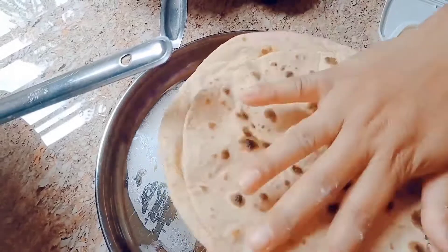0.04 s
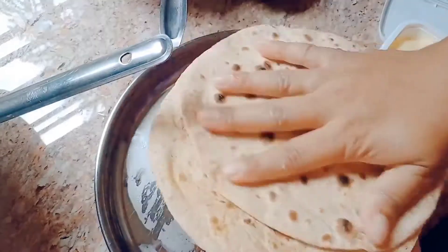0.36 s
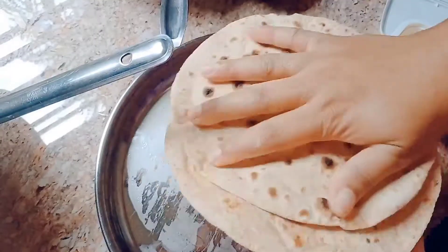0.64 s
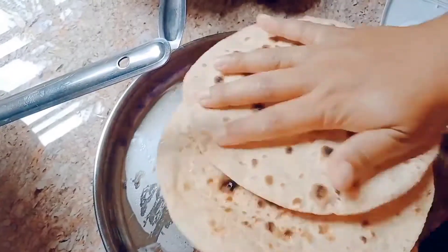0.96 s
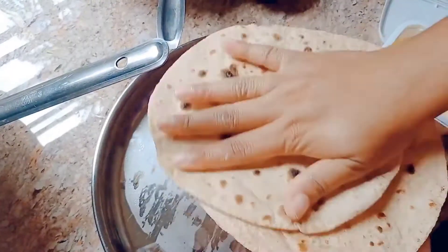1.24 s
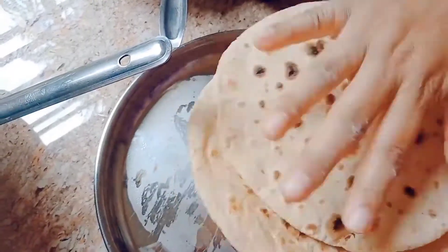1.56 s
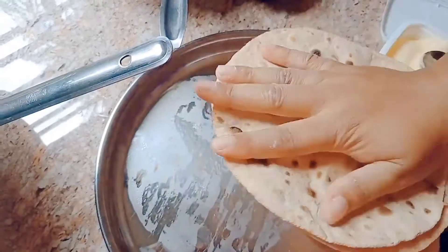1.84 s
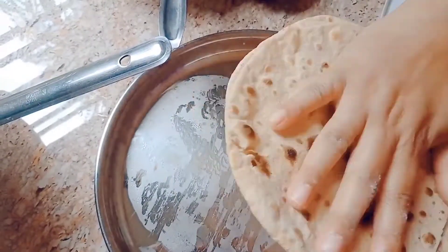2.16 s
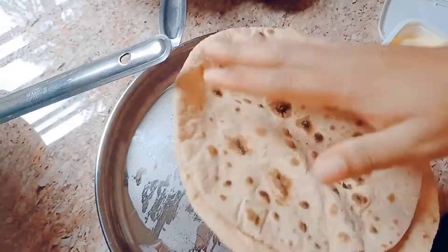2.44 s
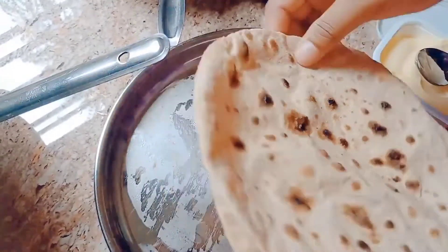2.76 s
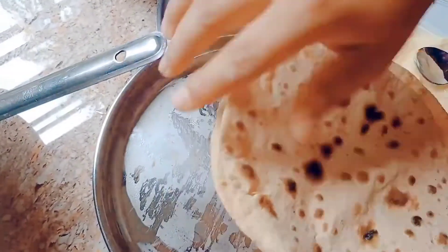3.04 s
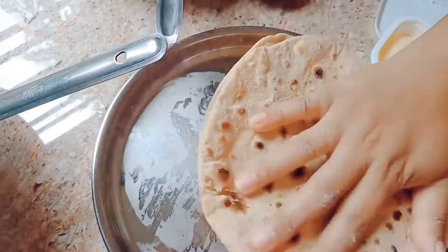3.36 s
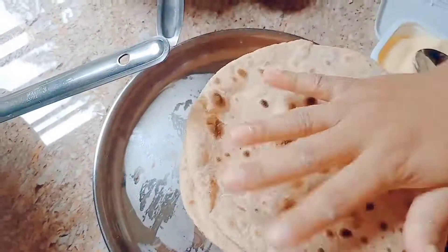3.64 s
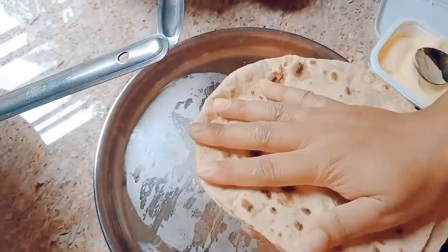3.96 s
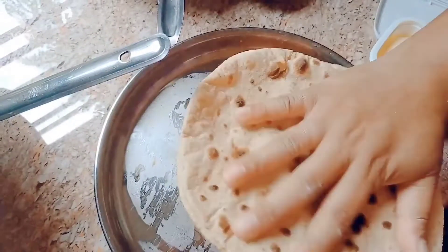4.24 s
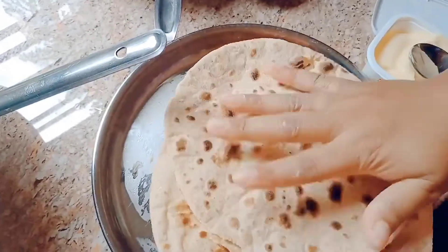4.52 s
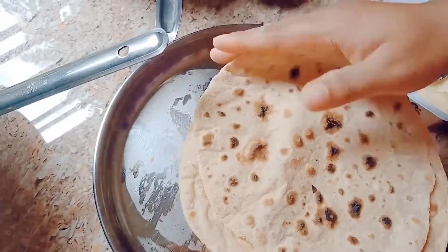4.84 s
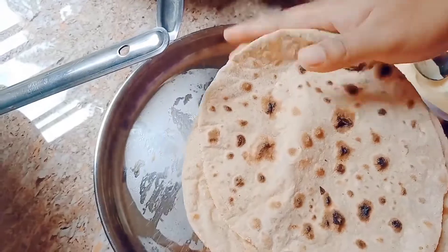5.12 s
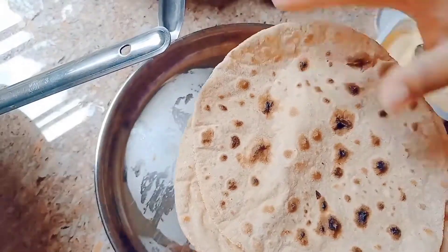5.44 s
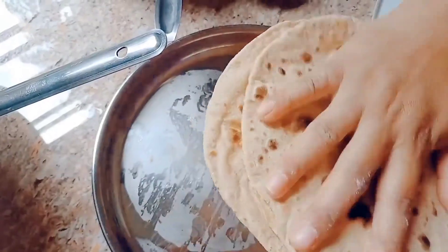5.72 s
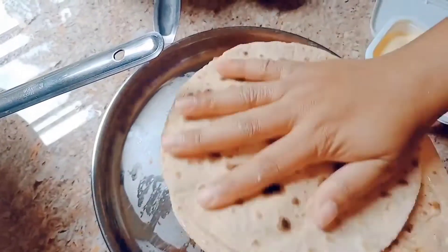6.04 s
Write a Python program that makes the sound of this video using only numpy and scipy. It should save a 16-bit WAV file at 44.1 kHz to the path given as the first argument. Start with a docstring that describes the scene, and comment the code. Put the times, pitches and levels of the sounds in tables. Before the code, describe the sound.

A hand rubs flatbreads together on a steel plate, heard up close in a small kitchen with faint, low room tone. From the start until about 1.5 seconds there is a continuous circling rasp, dry and grainy, with tiny snaps of crust. A soft pat and two brisk strokes follow at about 1.7 and 2.2 seconds, then lighter sliding and a couple of flakes cracking near 2.9. At 3.1 seconds the plate knocks on the counter, with a quick bright rattle and a short, damped metallic ring. Short rubbing strokes return around 3.4, 3.9, 4.3 and 4.8 seconds, some with gentle pats. Just after 5 seconds, fingertips graze the bread's edge with a soft scrape and a faint, high squeak. From 5.6 seconds, light pats lead into a last run of scuffing strokes that fades at about 6.3 seconds.

```python
"""A close, grainy rasp circles round and round, then breaks into short strokes: a hand is rubbing
buttered flatbreads together on a steel plate in a small kitchen. The blistered crusts catch and slip
in dense tiny grains, flakes snap, and the hand pats the stack. Midway the bread is turned over and
flops down, knocking the plate on the stone counter. Later, fingertips graze the edge with a faint squeak."""
import sys
import numpy as np
from scipy import signal
from scipy.fft import rfft, irfft
from scipy.io import wavfile
from scipy.ndimage import uniform_filter1d

SR = 44100
rng = np.random.default_rng(int(sys.argv[2]) if len(sys.argv) > 2 else 0)


def digitize_waveform(pressure):
    """Quantize a signal to 16-bit integers and store it at the path in sys.argv[1].

    Rows of a 2-D input are taken as channels; values are limited to [-1, 1].
    """
    field = np.atleast_2d(pressure).T
    bounded = np.clip(field, -1, 1)
    quanta = np.round(bounded * 32767).astype(np.int16)
    wavfile.write(sys.argv[1], SR, quanta)


N = 276948
T = np.arange(N) / SR

# The colour of the room tone. Each row: frequency in Hz, relative level in dB.
ROOM_TONE_EQ = [(15, -87.5), (25, -47.5), (64, -12.5), (77, -7.5), (99, -9.5), (129, -4.5), (246, -2),
                (410, -10), (495, -13.5), (598, -13), (945, -23.5), (1110, -20.5), (2770, -16),
                (5140, -45.5), (15500, -71.5)]
# The kitchen's low resonances. Each row: frequency in Hz, level in dB.
ROOM_MODES = [(185, -62), (260, -71), (330, -60.5), (400, -65)]
# The long circling rub. Each row: time in seconds, scuff level in dB, crisp treble in dB over the scuff.
CIRCLING_RUB = [(0.075, -50.5, -17), (0.171, -24.5, -7.5), (0.251, -23, -7), (0.637, -23.5, -9.5),
                (0.693, -20.5, -11), (1.193, -24.5, -7.5), (1.285, -28, -8), (1.425, -33, -17.5),
                (1.52, -64.5, -5.5)]
# Single pushes, brisk to light. Each row: start, speed-up time and slow-down time in seconds,
# scuff level in dB, then raspy bite and crisp treble in dB over the scuff.
PUSHES = [(0.067, 0.0064, 0.057, -39.5, -10.5, -6), (1.654, 0.056, 0.043, -31, -15, -14.0),
          (1.706, 0.063, 0.11, -20.5, -5.0, -5.5), (2.1, 0.043, 0.047, -43.5, -11, -12),
          (2.166, 0.073, 0.11, -19.5, -3, -5.0), (2.343, 0.004, 0.19, -52, -4, -11),
          (2.649, 0.032, 0.15, -44, -12, -13), (2.734, 0.062, 0.23, -42.5, -9.5, -11.5),
          (2.985, 0.023, 0.042, -43, -5, -12.5), (3.03, 0.019, 0.057, -47.5, -4.5, -11.5),
          (3.268, 0.048, 0.15, -42.5, -10, -10), (3.361, 0.08, 0.052, -27, -6, -9.5),
          (3.44, 0.065, 0.038, -27, -5.5, -7), (3.533, 0.052, 0.18, -54.5, -9, -7.5),
          (3.763, 0.017, 0.026, -40, -12.5, -18), (3.834, 0.068, 0.091, -23, -3.5, -4.5),
          (4.141, 0.15, 0.053, -47, -5, -7.5), (4.271, 0.09, 0.072, -27.0, -4, -7),
          (4.415, 0.028, 0.12, -48.5, -2.5, -7.5), (4.792, 0.035, 0.067, -31, -9.5, -13.0),
          (5.584, 0.015, 0.13, -46.5, -6.0, -10.5), (5.649, 0.17, 0.07, -25, -4, -11.5),
          (5.868, 0.073, 0.22, -26, -4.0, -10.0), (5.996, 0.061, 0.073, -31.0, -5, -6.0),
          (6.14, 0.037, 0.086, -33.5, -5.5, -7)]
# The rub's colours: mid scuff, crisp top, dull drag. Each row: frequency in Hz, relative level in dB.
SCUFF_EQ = [(590, -41.5), (1000, -17), (1410, -10.5), (1540, -6), (1720, -5.5), (1880, -1), (2180, -0.5),
            (2480, 0.5), (3690, -12.5), (4000, -11), (5320, -31.5), (6000, -30), (7800, -46.5),
            (13200, -120)]
CRISP_EQ = [(2940, 9.5), (5000, -4.5), (5300, -8), (7560, -8), (8490, -1.5), (8870, 2), (9720, -7.5),
            (10700, -11.5), (12100, -9), (13300, -2), (14100, -0.5), (14900, 2), (15800, -12.5)]
DRAG_EQ = [(40, -48), (130, -6.5), (300, -5), (560, -1), (800, -1.5), (1100, 0.5), (1500, -2),
           (2200, -27.5)]
# The steel plate, damped by the bread. Each row: frequency in Hz, level in dB, 60 dB decay in seconds.
PLATE_MODES = [(166.7, -19.5, 0.4), (203.4, -1, 0.32), (290, -28.5, 1), (334, -0.5, 0.36),
               (364, -10.5, 0.52), (397, -14, 0.35), (413, -10, 0.31), (462, -15, 0.23), (575, -26, 0.25),
               (637, -8, 0.31), (688, -22, 0.35), (1061, -21, 0.42), (1190, -29, 0.15), (1596, -20, 0.14),
               (1724, -22, 0.26), (1856, -21, 0.18), (1990, -21.5, 0.18), (2056, -17.5, 0.22),
               (2490, -14.5, 0.11), (2570, -20.5, 0.22), (2695, -22.5, 0.14), (3254, -21, 0.11),
               (3536, -21.5, 0.11), (4200, -21, 0.11), (4560, -21.5, 0.1)]
# Flakes of crust breaking. Each row: start in seconds, relative level in dB.
CRUST_SNAPS = [(0.079, -41), (0.1084, -27), (1.6501, -37), (2.1122, -45), (2.8493, -28.5), (2.8794, -34),
               (3.759, -38.5), (4.1604, -42), (4.807, -42)]
# The hand landing on the stack. Each row: start in seconds, then relative thud and slap levels in dB.
HAND_PATS = [(1.67, -39.5, -34), (3.29, -64, -38), (3.78, -39, -39), (4.782, -53, -43), (5.591, -43, -49),
             (5.667, -39.5, -47)]
# Blows on the plate. Each row: time in seconds, relative level in dB, contact time in milliseconds,
# crack in dB over the blow.
PLATE_KNOCKS = [(3.0871, -20.5, 1.9, -19), (3.0974, -16, 1.7, -24), (3.1036, -22, 0.56, 5.5),
                (3.111, -15, 1.74, -10), (3.1208, -27, .3, -6), (3.1308, -31, 1, -2), (3.144, -42, 0.9, -5)]
# The colour of the knock's dry, bright rattle, with the microphone's resonant peaks.
# Each row: frequency in Hz, relative level in dB.
RATTLE_EQ = [(200, -14.5), (850, -22), (1200, -7), (2500, 4), (4400, 1), (6000, -6.5), (8800, 2),
             (11000, -18), (14500, 0)]

CREEP_DB, CREEP_T60_S = -26.5, 0.5  # after a push the bread creeps on and settles


def undb(db):
    """Decibels to gain."""
    return 10 ** (np.asarray(db) / 20)


def unit(x):
    """Scale to rms 1."""
    return x / np.sqrt(np.mean(x ** 2))


def noise():
    """White noise for the whole scene."""
    return rng.standard_normal(N)


def ring(x, response):
    """Pass a sound through an impulse response."""
    return signal.fftconvolve(x, response)[:N]


def fade(t60):
    """Exponential decay, 60 dB down after t60 seconds."""
    return np.exp(-np.log(1000) * T / t60)


def swell(start, attack, hold, t60):
    """Envelope that rises, holds and dies away; times in seconds."""
    release_age = np.maximum(T - start - attack - hold, 0)
    return np.clip((T - start) / attack, 0, 1) * np.exp(-np.log(1000) * release_age / t60)


def colour(x, points, size=4096):
    """Minimum-phase EQ through (Hz, dB) points."""
    hz, db = np.transpose(sorted(map(tuple, points)))
    grid = np.maximum(np.fft.rfftfreq(size, 1 / SR), 1)
    gain = undb(np.interp(np.log(grid), np.log(hz), db))
    cepstrum = irfft(np.log(gain))
    cepstrum[1:size // 2] *= 2
    cepstrum[size // 2 + 1:] = 0
    return ring(x, irfft(np.exp(rfft(cepstrum))))


def split(x, hz):
    """Crossover: the parts of a sound below and above a frequency."""
    low = signal.sosfiltfilt(signal.butter(6, hz, fs=SR, output="sos"), x)
    return low, x - low


def walk(rate):
    """Smooth random wander of spread 1, about rate changes a second."""
    hold = max(int(SR / rate), 1)
    steps = np.repeat(rng.standard_normal(N // hold + 1), hold)
    return unit(uniform_filter1d(steps, hold)[:N])


def narrow(cycles, width):
    """A narrow band of noise, width Hz wide, around a running count of cycles."""
    phase = 2 * np.pi * cycles
    return unit(walk(rate=width) * np.cos(phase) + walk(rate=width) * np.sin(phase))


def room_tone():
    """Steady kitchen air with a weak drone; its hollow low mids swell and sink, each band alone."""
    air = unit(colour(noise(), ROOM_TONE_EQ)) * undb(0.53 * walk(rate=9.6))
    drone = (1 + .5 * walk(rate=7.9)) * np.sin(2 * np.pi * 92.5 * T)
    hollow = sum(undb(db + 3 * walk(rate=4.0)) * narrow(hz * T, width=45) for hz, db in ROOM_MODES)
    return undb(-50.5) * air + undb(-61.5) * drone + hollow


def circling():
    """Scuff, bite and crisp envelopes of the long rub: the hand swings to and fro, ever more evenly."""
    times, db, crisp_db = np.transpose(CIRCLING_RUB)
    swing_hz, peak_s, settle_s, ease_in_s = 5.7, 0.281, 1, 0.019
    swing_db = 2 * np.exp(-T / settle_s) * np.cos(2 * np.pi * swing_hz * (T - peak_s))
    contact = swell(times[0] - ease_in_s, ease_in_s, times[-1] - times[0], CREEP_T60_S)
    scuff = undb(np.interp(T, times, db) + swing_db) * contact
    crispness_db = np.interp(T, times, crisp_db)
    bite_db = -1 + 0.62 * crispness_db  # the rasp grows with crispness
    return scuff, scuff * undb(bite_db), scuff * undb(crispness_db)


def stroke(start, rise, fall, db, bite_db, crisp_db):
    """Scuff, bite and crisp envelopes of one push: the hand speeds up and slows, the bread creeps on."""
    age = T - start
    ramp = np.clip(np.minimum(age / rise, (rise + fall - age) / fall), 0, 1)
    speed = np.sin(np.pi / 2 * ramp)
    creep = undb(CREEP_DB) * swell(start, rise, fall, CREEP_T60_S)
    slide = np.hypot(speed ** 1.16, creep)
    # steeper curves on the upper bands make the push brightest at full speed
    return undb(db) * slide, undb(db + bite_db) * slide ** 1.18, undb(db + crisp_db) * slide ** 1.29


def rub_envelopes():
    """Scuff, bite and crisp envelopes of all moves, added in power; passing blisters make them uneven."""
    hiss_floor = undb([-58.5, -68, -75.5])[:, None]  # a faint background hiss stays between the strokes
    power = sum(np.square(stroke(*row)) for row in PUSHES) + np.square(circling()) + hiss_floor ** 2
    blisters = undb(1.14 * walk(rate=45.25))
    return np.sqrt(power) * blisters


def slips(rate, spread_db):
    """Random stick-slip clicks, rate a second, many small and a few large; even in power at any rate."""
    happen = rng.random(N) < rate / SR
    size = undb(spread_db * np.minimum(rng.exponential(size=N), 5))
    return unit(happen * size * rng.choice([-1, 1], N) / np.sqrt(rate))


def flakes(x):
    """Voice clicks as thin brittle flakes, which have nothing below the treble."""
    return split(colour(x, CRISP_EQ), hz=4400)[1]


def crumbs():
    """Sparse dry ticks of loose crumbs under the hand."""
    ticks = slips(rate=40, spread_db=0.5)
    crackle = ring(ticks, fade(t60=0.012) * noise())
    return unit(colour(crackle, SCUFF_EQ)) + undb(-6) * unit(flakes(crackle))


def plate_response():
    """The plate's ring after a tap; the rim is not quite round, so each mode has a close, weaker twin."""
    response = np.zeros(SR)
    for hz, db, t60 in PLATE_MODES:
        phase = 2 * np.pi * hz * T[:SR]
        pair = np.cos(phase) + .45 * np.sin(1.006 * phase)
        response += undb(db) * fade(t60)[:SR] * pair
    return response


def rubbing(plate):
    """Crust slides on crust; the grip flutters, and the plate beneath rings faintly along."""
    scuff_gain, bite_gain, crisp_gain = rub_envelopes()
    # a slow slide crackles in separate grains, a fast one fuses into a hiss
    speed = np.clip(scuff_gain / undb(-23), .02, 2) ** .55
    grip = unit(undb(0.48 * walk(rate=130)))
    catches = unit(colour(slips(rate=8000 * speed, spread_db=0) * grip, SCUFF_EQ))
    catches = split(catches, hz=400)[1]  # thin crust radiates no bass
    scuff, bite = split(catches + undb(-15) * unit(ring(catches, plate)), hz=3110)
    flaking = unit(flakes(slips(rate=13000 * speed, spread_db=0.5) * grip))
    crisp, fizz = split(flaking, hz=10130)
    fizz_gain = undb(1.3) * np.clip(crisp_gain / undb(-29.5), .6, 3) ** 0.79  # brisk strokes fizz most
    drag = unit(colour(slips(rate=4000, spread_db=1.5) * grip, DRAG_EQ))
    drag_gain = undb(-42.5) * (scuff_gain / undb(-24)) ** 0.62  # follows the scuff, with less range
    crumb_gain = undb(-8) * np.minimum(scuff_gain / undb(-47.5), 1)  # a light rub stirs them all
    return (undb(-1.06) * scuff_gain * unit(scuff)
            + undb(-1.04) * bite_gain * unit(bite)
            + undb(0.67) * crisp_gain * (crisp + fizz_gain * fizz)
            + drag_gain * (undb(1.4) * drag + crumb_gain * crumbs()))


def crust_snaps():
    """Single brittle flakes break with a brief crackle."""
    hits = np.zeros(N)
    for start, db in CRUST_SNAPS:
        hits[int(start * SR)] += undb(db)
    crackle = ring(hits, fade(t60=0.0091)) * noise()
    return undb(-2) * flakes(crackle) + undb(13) * colour(crackle, SCUFF_EQ)


def hand_pats():
    """The hand meets the soft stack: a dull, quickly damped thud under a dry slap."""
    thud, slap, thud_hz = np.zeros(N), np.zeros(N), 92
    for start, thud_db, slap_db in HAND_PATS:
        thud += undb(thud_db) * np.exp(-((T - start - .016) / 0.012) ** 2)
        slap[int(start * SR)] += undb(slap_db)
    puff_eq = [(30, -19), (60, -9.5), (100, -2.5), (200, 0.5), (400, -9.5), (900, -26), (4000, -78)]
    puff = unit(colour(noise(), puff_eq))
    body = undb(-11.5) * np.sin(2 * np.pi * thud_hz * T) + undb(-1.5) * puff
    skin = unit(colour(slips(rate=2000, spread_db=10), SCUFF_EQ))
    return thud * body + ring(slap, fade(t60=0.088)) * skin


def plate_knocks(plate):
    """The bread lands softly, then the plate hits the counter and chatters to rest."""
    push, crack = np.zeros(N), np.zeros(N)
    for time, db, contact_ms, crack_db in PLATE_KNOCKS:
        age_ms = (T - time) * 1000
        pulse = np.exp(-(2 * age_ms / contact_ms) ** 2)  # a longer contact leaves out the high modes
        push += undb(db) * pulse / pulse.sum()
        crack[int(time * SR)] += undb(db + crack_db)
    # every contact sets off a dry, bright rattle that also feeds the high modes
    grit = unit(colour(slips(rate=7300, spread_db=3), RATTLE_EQ))
    rattle = ring(crack, fade(t60=0.031) + undb(-27) * fade(t60=0.54)) * grit
    chatter = ring(crack, fade(t60=0.11)) * grit
    clang = ring(push + undb(-27.5) * chatter, plate)
    clang = colour(clang, [(30, -21), (100, -24), (175, -1.5)])  # little deep bass
    # the heavy stack shudders on the plate and roughens the low ring
    shudder_eq = [(40, -35), (130, -35), (190, -1), (420, 10), (720, -7.5), (950, -34), (4000, -75)]
    shudder = ring(push, fade(t60=0.55)) * unit(colour(noise(), shudder_eq))
    return undb(2.5) * clang + undb(-13) * rattle + undb(-21) * shudder


def fingertip_brush():
    """Fingertips graze the dry edge: a soft scrape with sparse crinkles."""
    scrape = unit(colour(slips(rate=4700, spread_db=4), SCUFF_EQ))
    crinkle = unit(flakes(slips(rate=780, spread_db=-1)))
    envelope = swell(start=5.04, attack=0.077, hold=0.071, t60=0.36)
    return undb(-53) * envelope * (scrape + undb(-18.5) * crinkle)


def squeak():
    """A narrow band of friction noise that drifts upward."""
    start, glide_s = 5.05, 0.095
    hz = 2340 + 128.7 * np.clip((T - start) / glide_s, 0, 1)
    band = narrow(np.cumsum(hz) / SR, width=400)
    return undb(-45.5) * band * swell(start, attack=0.026, hold=0.085, t60=0.43)


def kitchen_reverb(x, wet_db, t60):
    """Hard kitchen walls return a short tail whose treble dies first."""
    low = colour(noise(), [(100, 0), (2500, -4), (6000, -5.5), (15000, -17.5)]) * fade(t60)
    high = colour(noise(), [(2000, -21.5), (6000, -12), (15000, -8)]) * fade(t60=0.15)
    tail = (low + high) * (T > .004)  # pre-delay
    return x + undb(wet_db) * ring(x, tail[:SR] / np.sqrt(np.sum(tail ** 2)))


def scene():
    """Bread, plate and hand up close, in mono over a bed of room tone."""
    plate = plate_response()
    close = (rubbing(plate) + plate_knocks(plate) + crust_snaps()
             + hand_pats() + fingertip_brush() + squeak())
    return (kitchen_reverb(close, wet_db=-15, t60=0.27) + room_tone())[None]


def record(dry):
    """A steep low-pass takes off the very top."""
    top_hz = 15600
    return signal.sosfilt(signal.ellip(10, .2, 80, top_hz, fs=SR, output="sos"), dry)


dry = scene()
out = record(dry)
digitize_waveform(out)
```